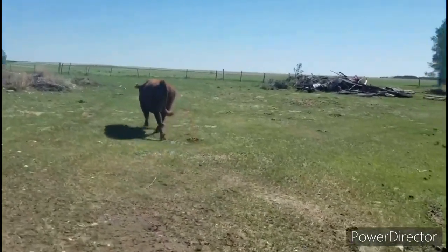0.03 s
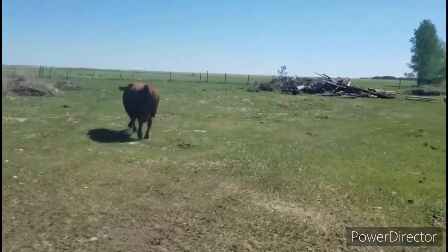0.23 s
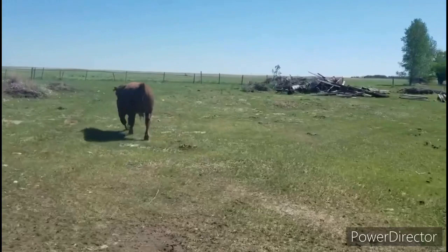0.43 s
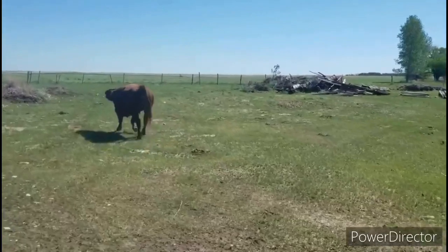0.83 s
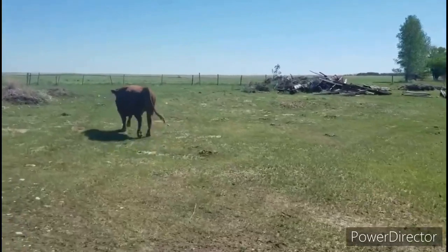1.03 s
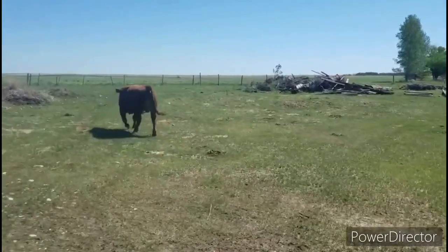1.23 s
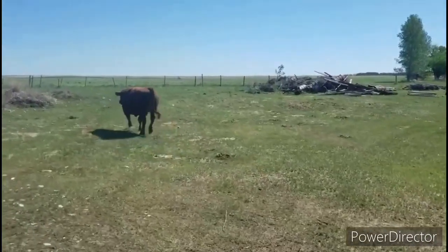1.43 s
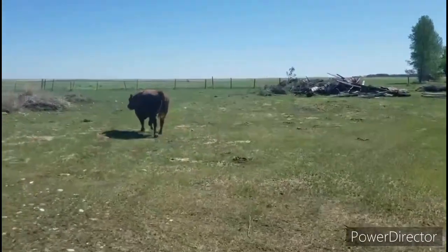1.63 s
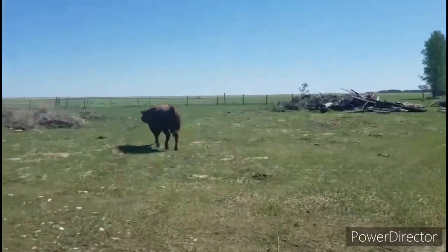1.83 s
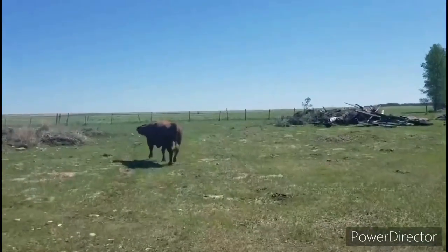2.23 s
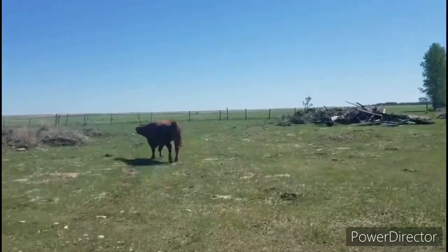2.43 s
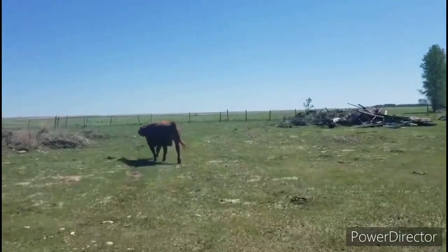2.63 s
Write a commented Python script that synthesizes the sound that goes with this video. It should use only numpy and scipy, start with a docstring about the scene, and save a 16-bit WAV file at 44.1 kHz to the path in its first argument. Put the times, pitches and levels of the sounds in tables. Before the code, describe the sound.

Two high, raspy bull calls and a few snorts sound over rumbling wind outdoors.

```python
"""A bull bellows twice in an open pasture. Each call slides up, breaks into a high squeal and sinks:
the vocal folds and a second, higher vibration sound together, wrapped in hoarse breath. A weak groan
leads into the second call and a reedy whistle ends it. Snorts burst from the nostrils during and
between the calls. Wind buffets the microphone; dry grass ticks underfoot over a faint field hiss."""
import sys
import numpy as np
from scipy import signal
from scipy.io import wavfile
from scipy.ndimage import uniform_filter1d

SR = 44100
rng = np.random.default_rng(int(sys.argv[2]) if len(sys.argv) > 2 else 0)


def unload_audio(sound):
    """Save the sound as a 16-bit wav file, at the path given as the first command line argument."""
    columns = np.transpose(np.atleast_2d(sound))
    # keep every value between -1 and 1, then stretch to whole-number steps
    steps = np.round(np.clip(columns, -1, 1) * 32767)
    wavfile.write(sys.argv[1], SR, steps.astype(np.int16))


N = 119070
T = np.arange(N) / SR

# vocal folds, per call: t/s, pitch/Hz, level/dB, overtone gain/dB
FOLD_CURVES = [
    [(.06, 215.1, -56, 1), (.13, 238.2, -41, -33), (.2, 314.5, -40.5, 1), (.28, 396.3, -41, -4.5),
     (.31, 399.9, -33, -11.5), (.4, 406, -43.5, 4.5), (.5, 409.1, -34.5, -4), (.55, 400.5, -30.5, -6),
     (.595, 433.4, -26.5, -4.5), (.62, 410.6, -28.5, -3), (.71, 391.8, -23.5, -4), (.76, 378.4, -30, 4),
     (.82, 363, -30, 3), (.88, 338.5, -36.5, 1.5), (.905, 331.6, -32.5, -6.5), (.945, 223, -29.5, -17),
     (.97, 204.1, -49.5, -16)],
    [(1.68, 318.6, -45.5, 10), (1.73, 364.4, -45.5, -1), (1.81, 402.8, -38, 4.5), (1.85, 388, -50.5, 7),
     (1.94, 354.2, -46.5, 8.5), (2.0, 356.7, -32.5, 7.5), (2.055, 361.7, -28, -1.5), (2.09, 394.6, -30, 4),
     (2.11, 384.9, -29.5, 8), (2.16, 384, -24.5, 2.5), (2.225, 382, -23, 4.5), (2.29, 349.6, -27, 2),
     (2.36, 348.7, -27, 3.5), (2.395, 341.6, -28.5, -0.5), (2.408, 300, -35.5, -7),
     (2.44, 235.2, -34.5, -3.5), (2.47, 210, -58.5, -10)],
]
# second vibration, per call: t/s, pitch/Hz, level/dB
SQUEAL_CURVES = [
    [(.32, 470.5, -43.5), (.35, 524.8, -28.5), (.4, 534.7, -26.5), (.48, 528, -28.5), (.6, 509.3, -30.5),
     (.68, 476.8, -29), (.745, 439.4, -30.5), (.765, 469.3, -62), (.79, 493.5, -34.5), (.84, 505, -33.5),
     (.9, 493.8, -30.5), (.93, 485, -61)],
    [(1.822, 505, -35.5), (1.832, 526.7, -29), (1.89, 514.2, -22.5), (1.925, 473.7, -29),
     (1.955, 497, -21.5), (2.01, 494.8, -34), (2.05, 524.5, -36.5), (2.08, 529.2, -32), (2.13, 498.2, -31),
     (2.23, 471, -28), (2.28, 461, -34), (2.33, 509.5, -33.5), (2.38, 484, -46)],
]
# squeal partials: harmonic number, level/dB
SQUEAL_PARTIALS = [(1, 0), (2, -25), (3, -21.5), (4, -29)]
# fold timbre, per call: jitter/fraction, flutter/dB, mouth resonance width/Hz, tilt/(dB/octave)
CALL_TIMBRES = [(.016, 1.9, 80, -28), (.009, 1.3, 60, 2)]
def bellow(fold_curve, squeal_curve, timbre):
    """Two coupled vibrations at unrelated pitches beat together; returns voice and fold opening."""
    jitter, flutter_db = timbre[:2]
    squeal_hz, phase, level = vibration(squeal_curve, 1.1 * jitter, .95 * flutter_db)
    fold_hz = in_time(fold_curve)[0]
    beat = np.sin(2 * np.pi * np.cumsum(squeal_hz - fold_hz) / SR)
    push_rad = .13 * beat * np.tanh(level / from_db(-31.5))
    tone, opening = folds(fold_curve, *timbre, push_rad=push_rad)
    squeal = level * sum(from_db(db) * np.sin(k * phase) for k, db in SQUEAL_PARTIALS)
    return tone + squeal * (1 + .07 * opening), opening


# throat response: f/Hz, gain/dB
THROAT_RESPONSE = [(200, 0), (400, -15), (480, 9), (620, -3), (690, -9.5), (750, -18.5), (900, -5),
                   (1040, -25.5), (1140, -14.5), (1400, -11), (1550, -21), (1750, -20.5), (2080, -25.5),
                   (2300, -38), (2700, -55.5), (3400, -57), (4500, -64.5)]
# mouth resonance, moved by the jaw: t/s, f/Hz, lift/dB
MOUTH_RESONANCE = [(.62, 1205, 8.5), (.81, 1115, 11.5), (.88, 1350, 5), (1.55, 645, 2), (1.76, 645, 5),
                   (1.93, 1380, 10), (2.07, 1150, 2.5), (2.23, 1155, -2.5), (2.29, 1400, 0.5),
                   (2.4, 1380, -2.5)]
SLACK_BELOW_HZ, TILT_FROM_HZ = 340, 1400
def folds(curve, jitter, flutter_db, mouth_width_hz, tilt_db, push_rad=0):
    """Fold harmonics shaped by throat and mouth, rough when slack; returns tone and fold opening."""
    pitch_hz, _, overtone_db = in_time(curve)
    mouth_hz, lift_db = in_time(MOUTH_RESONANCE)
    slack = np.clip(1 - pitch_hz / SLACK_BELOW_HZ, 0, 1)
    _, phase, level = vibration(curve, jitter + .3 * slack, flutter_db)
    phase = phase + push_rad
    tone = np.sin(phase)
    for k in range(2, 14):
        hz = k * pitch_hz
        mouth_db = lift_db * np.exp(-.5 * ((hz - mouth_hz) / mouth_width_hz) ** 2)
        treble_db = tilt_db * np.log2(np.maximum(hz / TILT_FROM_HZ, 1))
        flicker_db = 1.7 * drift(25)
        gain = from_db(at_hz(THROAT_RESPONSE, hz) + mouth_db + treble_db + overtone_db + flicker_db)
        tone = tone + gain * np.sin(k * phase + rng.uniform(0, 2 * np.pi))
    opening = np.sin(phase) * (T > curve[0][0]) * (T < curve[-1][0])
    return level * tone, opening


WANDER_FRACTION, WANDER_HZ, JITTER_HZ, FLUTTER_HZ, FADE_S = .006, 22, 117, 54.5, .0053
def vibration(curve, jitter, flutter_db):
    """Pitch, phase and amplitude of an unsteady oscillation that fades outside its curve."""
    hz, db = in_time(curve)[:2]
    unsteady_hz = hz * (1 + jitter * drift(JITTER_HZ) + WANDER_FRACTION * drift(WANDER_HZ))
    phase = 2 * np.pi * np.cumsum(unsteady_hz) / SR
    level = np.sqrt(2) * from_db(db + flutter_db * drift(FLUTTER_HZ))
    outside_s = np.abs(T - np.clip(T, curve[0][0], curve[-1][0]))
    return hz, phase, level * decay(outside_s, FADE_S)


# vocal folds: t/s, pitch/Hz, level/dB, overtone gain/dB
GROAN_CURVE = [(1.53, 301, -61.5, 7), (1.57, 312.5, -52.5, 14), (1.62, 326.5, -45.5, 13.5),
               (1.69, 297.1, -51, 11.5), (1.76, 285.2, -54.5, 6.5), (1.8, 275, -55, 5.5)]
def groan():
    """The folds vibrate weakly and roughly ahead of the second call."""
    return folds(GROAN_CURVE, jitter=.13, flutter_db=2.5, mouth_width_hz=72, tilt_db=-7.5)[0]


# breath: t/s, level/dB, treble gain/dB
RASP_CURVE = [(0, -59, 23), (.08, -61, -31), (.13, -36.5, 6.5), (.17, -45.5, -12), (.27, -46.5, -4),
              (.31, -31.5, 14.5), (.38, -25, 8.5), (.46, -26.5, 7), (.56, -30, 2), (.68, -31.5, -4.5),
              (.78, -37, 0.5), (.88, -35.5, -31), (.95, -58, -17), (1.1, -70.5, 25), (1.5, -50.5, 6),
              (1.55, -45, -17), (1.61, -38, -21), (1.69, -49, 6), (1.77, -44.5, -1.5), (1.88, -41, 4.5),
              (1.95, -34.5, -14.5), (2.0, -34.5, 2), (2.12, -34, -6), (2.23, -33, -2.5), (2.33, -32, -2.5),
              (2.405, -36.5, 9), (2.46, -52, 8.5), (2.52, -60, 12), (2.7, -102, 0)]
# low breath resonances: t/s, gain/dB
CHEST_CURVE = [(.1, 0.5), (.3, 2), (.42, -0.5), (.7, -8), (.85, -6.5), (1.2, -2), (1.62, 1), (1.86, -5.5),
               (2.05, -1.5), (2.3, -13), (2.5, 8.5)]
# throat resonances: f/Hz, width per stage/Hz, gain/dB
FORMANTS = [(268, 120, 7), (455, 196, 3), (765, 275, 0), (1122, 170, -5), (1351, 330, -1.5),
            (1740, 430, -8), (2230, 120, -17.5), (3274, 1400, -24), (4240, 2900, -39.5), (9230, 8700, -42)]
# breath and snorts: f/Hz, left-right correlation
BULL_CORRELATION = [(200, 0.79), (500, 1), (1200, 0.93), (2200, 0.12), (5000, 0.34), (12000, 0.52)]
CHEST_BELOW_HZ, TREBLE_FROM_HZ = 1000, 2600
def rasp(opening):
    """Breath noise, chopped by the folds, rings the throat."""
    db, treble_db = in_time(RASP_CURVE)
    chest_db, = in_time(CHEST_CURVE)
    pulsing = 1 + .68 * opening
    plain = shaped = 0
    for hz, width_hz, gain_db in FORMANTS:
        mid, side = rng.standard_normal((2, N)) * pulsing * from_db(gain_db + 2 * drift(21))
        breath = stereo(mid, side, at_hz(BULL_CORRELATION, hz))
        rung = resonance(resonance(breath, hz, width_hz), hz, width_hz)
        shelf_db = treble_db * (hz >= TREBLE_FROM_HZ) + chest_db * (hz < CHEST_BELOW_HZ)
        plain = plain + rung
        shaped = shaped + rung * from_db(shelf_db)
    return from_db(db) * shaped / np.std(plain)


# throat whistle: t/s, f/Hz, level/dB
WHISTLE_CURVE = [(2.16, 3365, -69), (2.26, 3450, -63), (2.3, 3530, -53), (2.34, 3500, -60.5),
                 (2.36, 4120, -59), (2.39, 4350, -62), (2.43, 4340, -70)]
def whistle(opening):
    """The tightening throat whistles; the folds chop the tone into a cluster of lines."""
    _, phase, level = vibration(WHISTLE_CURVE, jitter=.009, flutter_db=2.5)
    return level * np.sin(phase) * (1 + .7 * opening)


# air blasts: t/s, level/dB, hold/s, base fall/(dB/s) scaled per band, treble tilt/(dB/octave)
SNORTS = [(0.281, -29.5, 0.012, 319.5, 6), (0.36, -25, 0.0088, 182, 3), (1.237, -36, 0.12, 130, -7.5),
          (1.975, -42.5, 0.013, 173, 3.5)]
# blast spectrum: f/Hz, gain/dB
SNORT_SPECTRUM = [(150, 10), (400, 6.5), (900, 1.5), (1400, 4), (2100, -1), (2700, -8), (3400, -9),
                  (4700, -12.5), (6800, -40.5), (8700, -29.5), (10500, -29.5), (12500, -41.5),
                  (16000, -34.5)]
# nostril resonances: f/Hz, width/Hz, gain/dB
NOSTRILS = [(1986, 210, 2.5), (3250, 330, -13), (4640, 220, -13), (8570, 290, 9.5)]
SNORT_ATTACK_S, SNORT_TREBLE_HZ = .002, 1500
def snorts():
    """Sudden blasts of air ring the nostrils, hold and die, the treble first."""
    blasts = 0
    for hz, band in noise_bands(SNORT_SPECTRUM, BULL_CORRELATION, flicker_db=1.5):
        octaves = np.log2(max(hz / SNORT_TREBLE_HZ, 1))
        envelope = 0
        for start_s, db, hold_s, base_fall, tilt_db in SNORTS:
            attack = np.clip((T - start_s) / SNORT_ATTACK_S, 0, 1)
            fallen_db = base_fall * (.5 + .35 * octaves) * np.clip(T - start_s - hold_s, 0, 1)
            envelope = envelope + attack * from_db(db + tilt_db * octaves - fallen_db)
        blasts = blasts + band * envelope
    ringing = sum(from_db(db) * resonance(blasts, hz, width_hz) for hz, width_hz, db in NOSTRILS)
    return (blasts + ringing) * from_db(1.9 * drift(60) - .5)


# nostril slaps: t/s, level/dB, f/Hz
FLAPS = [(.283, -31, 4460), (0.292, -29, 4400), (.365, -34.5, 5650)]
def flaps():
    """Wet nostrils slap as a snort starts, ringing a narrow resonance of the nose."""
    out = 0
    for start_s, db, hz in FLAPS:
        age_s = np.maximum(T - start_s, 0)
        out = out + from_db(db) * np.sin(2 * np.pi * hz * age_s) * decay(age_s, tau_s=.003)
    return out


ECHO_DB, ECHO_T60_S, ECHO_TOP_HZ = -12.5, .27, 2500
def echoes(voice):
    """Faint, dull echoes scatter from the ground and a wood pile, different at each ear."""
    out = np.zeros((2, N))
    dull = signal.sosfilt(signal.butter(1, ECHO_TOP_HZ, fs=SR, output="sos"), voice)
    for k, delay_s in enumerate(rng.uniform(.002233, .11, 40)):
        lag = int(delay_s * SR)
        gain = rng.choice([-1, 1]) * from_db(-60 * delay_s / ECHO_T60_S)
        out[k % 2, lag:] += gain * dull[:N - lag]
    return from_db(ECHO_DB) * np.std(voice) * unit_power(out)


# wind rumble: t/s, level/dB
WIND_CURVE = [(0, -50.5), (.08, -45), (.22, -35.5), (.42, -33.5), (.62, -26.5), (.78, -32), (1.12, -32),
              (1.24, -31), (1.36, -29.5), (1.45, -36), (1.8, -33), (1.87, -39), (2.15, -38.5), (2.3, -43),
              (2.47, -37), (2.56, -46), (2.62, -38.5), (2.7, -46)]
# single buffets: t/s, width/s, level/dB
BUFFETS = [(0.269, 0.014, -37), (0.334, 0.018, -24), (0.478, 0.015, -20), (0.703, 0.019, -23.5),
           (0.905, 0.013, -24.5), (1.212, 0.012, -31.5), (1.247, 0.007, -24.5), (1.36, 0.014, -26),
           (1.952, 0.013, -21.5), (2.151, 0.02, -37), (2.62, 0.022, -37.5)]
# rumble and buffet spectra: f/Hz, gain/dB
WIND_SPECTRUM = [(20, -17.5), (45, -2), (80, 1), (130, -2.5), (200, -6), (330, -11.5), (500, -12.5),
                 (900, -40), (2000, -40.5), (5000, -63)]
BUFFET_SPECTRUM = [(20, -17.5), (50, -6.5), (85, 7.5), (130, -5.5), (220, -12), (500, -44.5), (2000, -79.5)]
# wind and hiss: f/Hz, left-right correlation
WIND_CORRELATION = [(30, .1), (100, 0.39), (300, 0.12), (2000, 0.1), (12000, 0.063)]
def wind():
    """Wind on the microphone: lumpy rumble with a few stronger buffets."""
    db, = in_time(WIND_CURVE)
    rumble = from_db(db + 1.5 * drift(30)) * noise(WIND_SPECTRUM, WIND_CORRELATION, flicker_db=3.5)
    buffets = sum(from_db(peak_db) * np.exp(-.5 * ((T - peak_s) / width_s) ** 2)
                  for peak_s, width_s, peak_db in BUFFETS)
    turbulence = noise(BUFFET_SPECTRUM, WIND_CORRELATION, flicker_db=3.1)
    running_rms = np.sqrt(uniform_filter1d(np.mean(turbulence ** 2, axis=0), size=1000) + .01)
    return rumble + buffets * turbulence / running_rms


# grass crackles: t/s, level/dB, f/Hz, decay/s
GRASS_TICKS = [(0.115, -70, 2170, .016), (.648, -58.5, 8960, 0.008), (1.001, -53.5, 7600, 0.0033),
               (1.154, -54.5, 5500, 0.0094), (1.239, -38.5, 1780, 0.006), (2.452, -41.5, 1402, 0.0059),
               (2.55, -42, 1130, 0.0048)]
def grass_ticks():
    """Dry grass crackles underfoot, each tick a noise burst in its own broad band."""
    out = 0
    for start_s, db, hz, tau_s in GRASS_TICKS:
        burst = rng.standard_normal((3, N)) * (T > start_s) * decay(T - start_s, tau_s) + 1e-18
        band = bandpass(burst, hz / 2, min(hz * 1.33, .45 * SR))
        bandwidth_gain = np.sqrt(.5 * SR / hz)
        out = out + from_db(db) * bandwidth_gain * (band[0] + .5 * band[1:])
    return out


# hiss spectrum: f/Hz, gain/dB
HISS_SPECTRUM = [(100, 17), (500, -5.5), (1000, 7), (2000, -5.5), (4000, -6.5), (7000, -9.5),
                 (12000, -10.5), (15000, -25.5)]
def field_hiss():
    """Faint, steady air all round."""
    return from_db(-60) * noise(HISS_SPECTRUM, WIND_CORRELATION, flicker_db=.8)


def from_db(db):
    """Decibels to gain."""
    return 10 ** (np.asarray(db) / 20)


def unit_power(x):
    """Scale to RMS 1."""
    return x / np.sqrt(np.mean(x ** 2) + 1e-20)


def decay(age_s, tau_s):
    """Exponential fall from 1."""
    return np.exp(-np.clip(age_s / tau_s, 0, 20))


def in_time(curve):
    """Columns of a curve, interpolated to every sample."""
    times, *columns = np.transpose(curve)
    return [np.interp(T, times, column) for column in columns]


def at_hz(spectrum, hz):
    """Read a spectrum on a log-frequency axis."""
    freqs, values = np.transpose(spectrum)
    return np.interp(np.log(hz), np.log(freqs), values)


def drift(rate_hz):
    """Smooth random motion, RMS 1."""
    step, warmup = 20, 2000
    pole = np.exp(-2 * np.pi * rate_hz * step / SR)
    white = rng.standard_normal(N // step + warmup + 2)
    slow = signal.lfilter([1], [1, -2 * pole, pole * pole], white)[warmup:]
    return np.interp(np.arange(N) / step, np.arange(len(slow)), unit_power(slow))


def resonance(x, hz, width_hz):
    """Two-pole resonator, peak gain 1."""
    r = np.exp(-np.pi * width_hz / SR)
    feedback = [1, -2 * r * np.cos(2 * np.pi * hz / SR), r * r]
    return signal.lfilter((1 - r * r) / 2 * np.array([1, 0, -1]), feedback, x)


def bandpass(x, low_hz, high_hz):
    """Band filter, 12 dB/octave skirts."""
    return signal.sosfilt(signal.butter(2, [low_hz, high_hz], "band", fs=SR, output="sos"), x)


def stereo(mid, side, correlation):
    """Mix two independent noises into a correlated left-right pair."""
    return np.sqrt(1 + correlation) * mid + np.sqrt(1 - correlation) * side * [[1], [-1]]


def noise_bands(spectrum, correlation, flicker_db):
    """Flickering third-octave stereo noise as (f/Hz, band); the sum has unit power."""
    edges_hz = 20 * 2 ** (np.arange(30) / 3)
    white = rng.standard_normal((2, 2, N))
    bands = []
    for k, (low_hz, high_hz) in enumerate(zip(edges_hz, edges_hz[1:])):
        hz = np.sqrt(low_hz * high_hz)
        mid, side = bandpass(white[k % 2], low_hz, high_hz)
        gain = from_db(at_hz(spectrum, hz) + flicker_db * drift(18))
        bands.append((hz, gain * stereo(mid, side, at_hz(correlation, hz))))
    total_rms = np.std(sum(band for _, band in bands))
    return [(hz, band / total_rms) for hz, band in bands]


def noise(spectrum, correlation, flicker_db):
    """Coloured stereo noise of unit power."""
    return sum(band for _, band in noise_bands(spectrum, correlation, flicker_db))


RIGHT_LAG_S, SNORT_LEFT_DB = .00005, 2
def scene():
    """The bull ahead and a little to the left, wind and field hiss all round."""
    calls = zip(FOLD_CURVES, SQUEAL_CURVES, CALL_TIMBRES)
    voice, opening = sum(np.array(bellow(*call)) for call in calls)
    voice = voice + groan()
    hiss = field_hiss()
    nose = (snorts() + flaps()) * from_db(SNORT_LEFT_DB * np.array([[.5], [-.5]]))
    left, right = voice + rasp(opening) + whistle(opening)
    throat = np.array([left, np.interp(T - RIGHT_LAG_S, T, right)])
    return throat + nose + echoes(voice) + wind() + grass_ticks() + hiss


CUTOFF_HZ = 15900
def record(dry):
    """Steep low-pass."""
    return signal.sosfilt(signal.ellip(10, .2, 70, CUTOFF_HZ, fs=SR, output="sos"), dry)


dry = scene()
out = record(dry)
unload_audio(out)
```